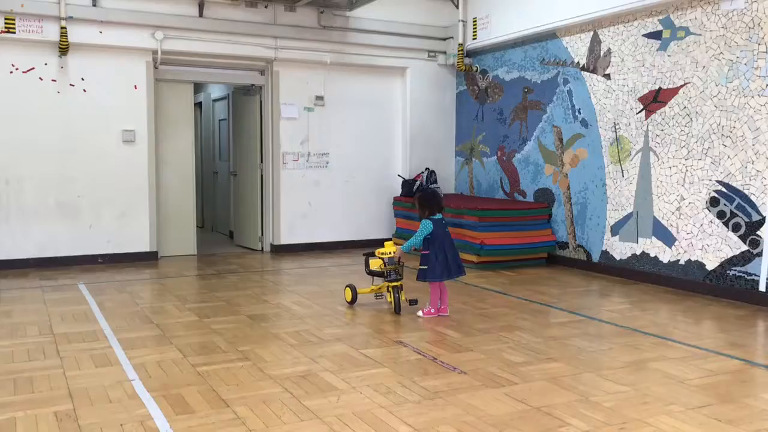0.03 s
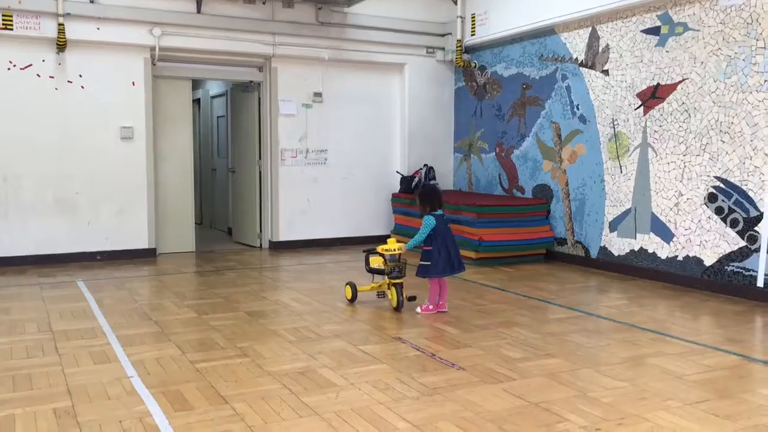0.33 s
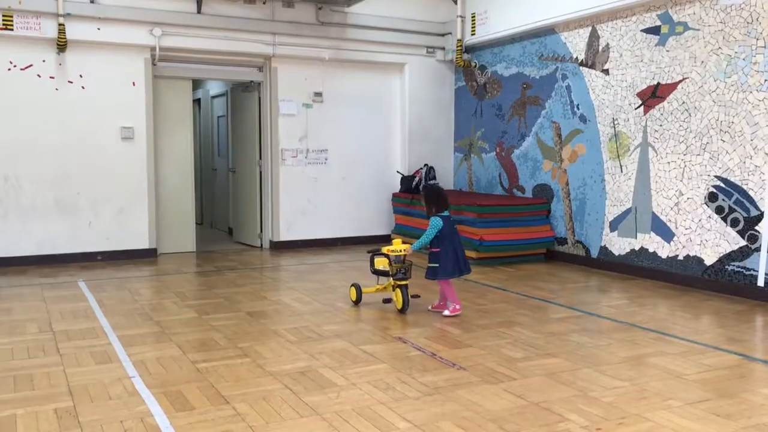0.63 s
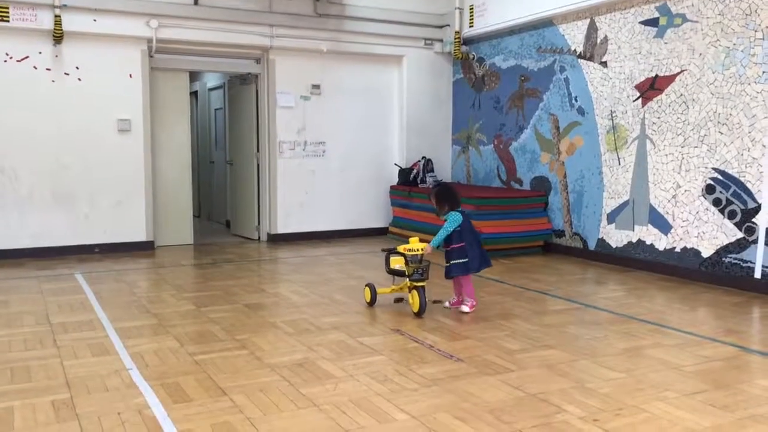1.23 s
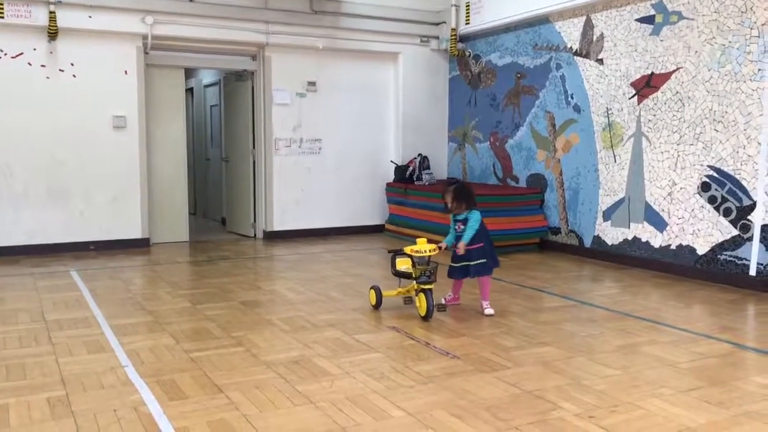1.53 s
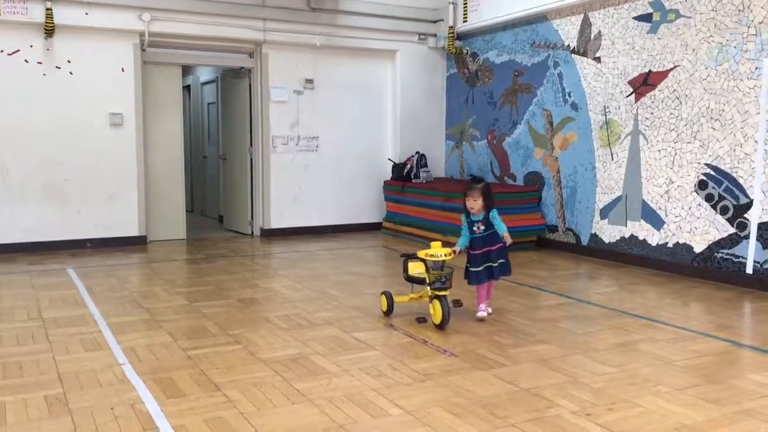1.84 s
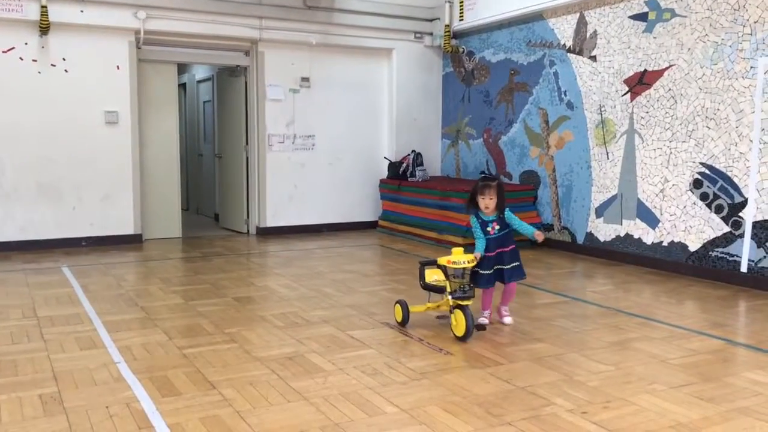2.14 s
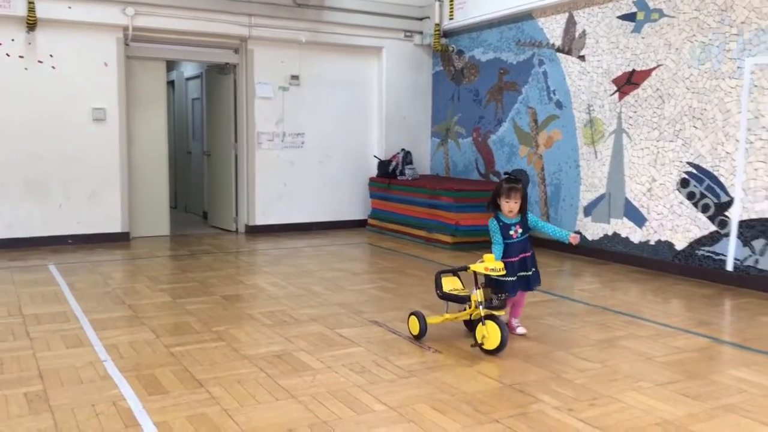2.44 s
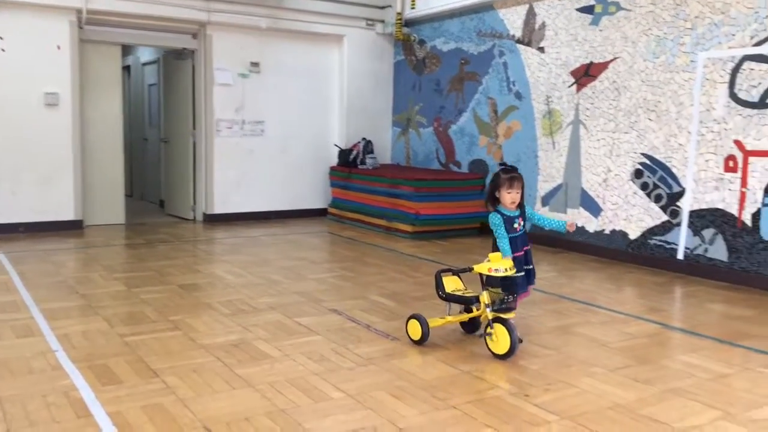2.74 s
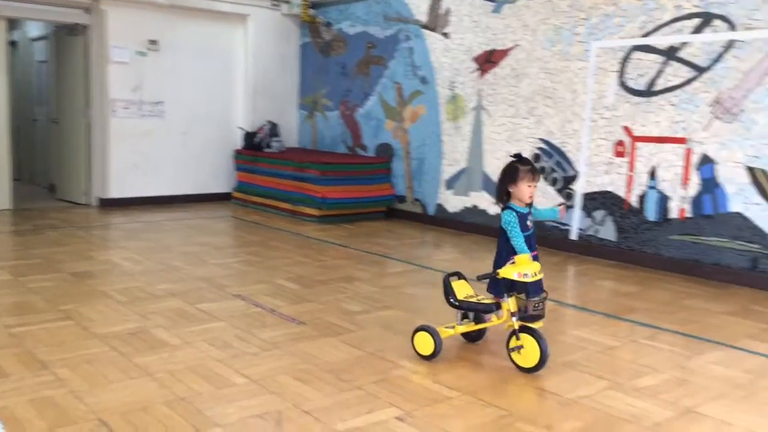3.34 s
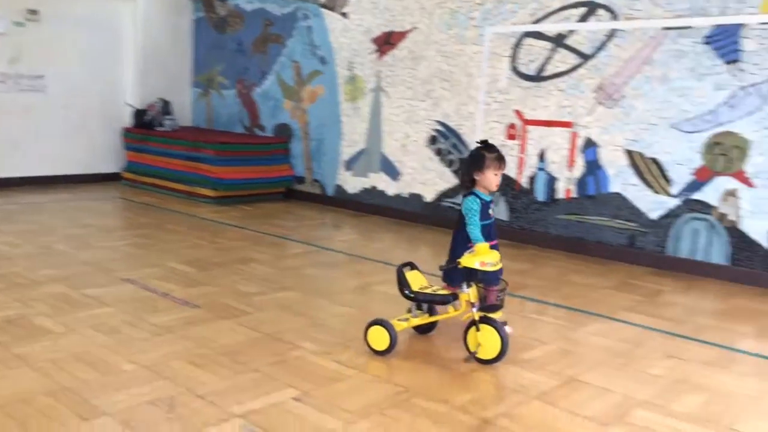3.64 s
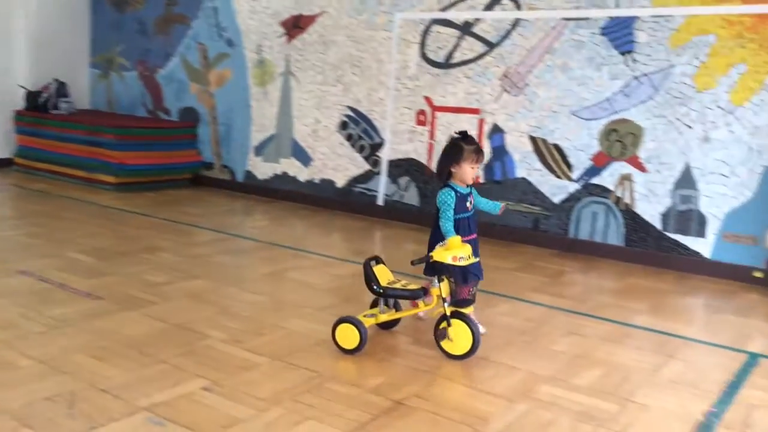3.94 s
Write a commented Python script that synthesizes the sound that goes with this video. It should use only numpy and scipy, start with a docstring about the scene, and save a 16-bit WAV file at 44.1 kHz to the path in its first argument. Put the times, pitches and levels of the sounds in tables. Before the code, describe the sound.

A small tricycle rolls over a wooden floor in an echoing hall with a steady low ventilation hum. Shoes scuff faintly at first, and the wheels start pattering and knocking at about 1 second. From 1.8 seconds it sounds closer and louder, its frame clattering and loose parts ticking. An axle squeals briefly four times between 1.9 and 3.2 seconds. The strongest rattles and thumps come around 3.3 to 3.8 seconds.

```python
"""Tricycle in an echoing hall

A small tricycle is pushed over the parquet towards the microphone. Its hard wheels patter and drum
on the boards, a wheel squeals on its axle, the frame clatters, loose parts tick and chirp, and shoes
scuff softly. The hall rings after each sound; behind it all lies the low hum of the ventilation."""
import sys
import numpy as np
from scipy import signal
from scipy.fft import rfft, irfft
from scipy.io import wavfile
from scipy.ndimage import uniform_filter1d

SR = 44100
rng = np.random.default_rng(int(sys.argv[2]) if len(sys.argv) > 2 else 0)


def put_to_file(sound):
    """Save the sound as 16-bit audio at rate SR, in the file named by the first command-line argument."""
    columns = np.atleast_2d(sound).T  # one column per channel
    safe = np.clip(columns, -1, 1)
    whole_steps = np.round(safe * 32767)
    wavfile.write(sys.argv[1], SR, whole_steps.astype(np.int16))


N = 176400

# rolling effort, rising as the tricycle nears the microphone: t/s, level/dB
ROLLING = [(0.1, -78), (0.85, -68), (1.08, -60.5), (1.19, -58.5), (1.45, -67), (1.53, -60.5), (1.66, -54.5),
           (1.77, -60), (1.82, -48.5), (2.05, -53), (2.25, -50), (2.42, -56.5), (2.6, -49.5), (3.05, -51),
           (3.25, -52), (3.4, -48), (3.52, -51), (3.65, -49), (4.0, -56.5)]
# low drumming of the wheels: t/s, level/dB
DRUMMING = [(0.1, -58.5), (1.53, -60), (1.64, -53.5), (3.3, -53), (3.34, -45), (4.0, -54)]
# tone colours of the wheels, floorboards and frame: f/Hz, level/dB
WHEEL_COLOUR = [(150, -27), (300, -13.5), (430, -5.5), (560, -3), (1250, -2.5), (1900, -6.5), (2700, -7),
                (3500, -11), (6000, -19.5), (9000, -31.5), (12000, -42)]
BOARD_COLOUR = [(100, -34.5), (170, 10.5), (220, 6), (300, 0.5), (420, -0.5), (700, -34.5)]
FRAME_COLOUR = [(150, -39.5), (400, -19.5), (900, -10.5), (1700, -8.5), (3000, -14), (6000, -26),
                (14000, -40)]
# resonances of wheels and frame: f/Hz, width/Hz, lift/dB
RESONANCES = [(300.5, 13.7, 14), (385.6, 10.5, 8), (552, 36, 6.5), (715, 98, 6.5), (927, 110, 6),
              (1210, 270, 4.5), (1430, 130, 4), (2540, 400, 3), (3000, 100, 0.5), (15500, 76, 13)]
# jolts that clatter the frame or thump the boards: t/s, level/dB, length/s, ringing f/Hz
FRAME_CLATTERS = [(0.915, -59, 0.091, 2550), (1.125, -53.5, 0.052, 1370), (1.53, -58, 0.091, 2640),
                  (1.792, -45.5, 0.059, 1600), (1.825, -52, 0.11, 3000), (2.149, -43.5, 0.11, 976),
                  (2.535, -49.5, 0.11, 2480), (3.325, -43, 0.12, 925), (3.577, -46, 0.086, 2130),
                  (3.588, -43, 0.045, 960)]
BOARD_THUMPS = [(0.915, -51, 0.065, 777), (1.13, -53, 0.092, 573), (1.525, -54.5, 0.12, 300),
                (2.16, -48.5, 0.14, 228), (3.335, -46, 0.092, 374), (3.525, -43.5, 0.03, 315),
                (3.585, -47.5, 0.13, 588), (3.715, -47.5, 0.071, 250)]
# squeals at the axle: t/s, length/s, level/dB, start f/Hz, end f/Hz
AXLE_SQUEALS = [(1.93, .17, -55, 1460, 1390), (2.17, .29, -55.5, 1290, 1250),
                (2.55, .42, -56.5, 1260, 1390), (3.085, .15, -47, 1320, 1260)]
# strikes of loose parts: t/s, level/dB, ringing f/Hz
PART_TICKS = [(1.215, -60.5, 10500), (1.226, -51, 4060), (1.486, -62, 11400), (1.583, -60, 9500),
              (1.618, -60, 6600), (1.632, -59, 4300), (1.793, -52.5, 4950), (1.811, -51.5, 6740),
              (1.927, -55, 12600), (1.96, -45.5, 7440), (2.034, -54.5, 7760), (2.049, -53.5, 6500),
              (2.15, -53.5, 4700), (2.264, -55, 7000), (2.303, -62, 9000), (2.614, -48, 6460),
              (2.629, -54, 8650), (2.827, -51.5, 7400), (2.928, -59, 6600), (2.976, -51, 4450),
              (3.117, -48.5, 9000), (3.187, -46.5, 8600), (3.283, -48, 6000), (3.332, -50, 5500),
              (3.376, -50, 6050), (3.417, -57, 5960), (3.578, -44.5, 3600), (3.692, -59, 12100),
              (3.709, -53, 5900), (3.808, -45.5, 14000), (3.807, -43, 4460)]
# rubs of soles and parts: t/s, length/s, level/dB, f/Hz, width/Hz
RUBS = [(0.2, .29, -72, 4700, 1600), (1.952, .025, -58, 7850, 600), (2.618, .115, -52.5, 4850, 480),
        (3.1, .02, -59, 9600, 1400), (3.182, .014, -60, 9600, 1400)]
# shoes sliding on the parquet: t/s, length/s, level/dB
SHOE_SCUFFS = [(0.46, 0.28, -69.5), (0.96, 0.28, -64.5), (2.396, 0.22, -59), (2.58, 0.11, -53.5)]
# hiss of a sliding sole: f/Hz, level/dB
SCUFF_COLOUR = [(2000, -3), (5000, 0), (9000, -3), (14500, -11)]
# tones of the ventilation fan: f/Hz, level/dB
FAN_TONES = [(45.1, -70), (77.9, -38.5), (110.9, -51.5), (180, -66.5), (2998, -79)]
# rush of air from the ventilation: f/Hz, level/dB
AIR_COLOUR = [(20, -44.5), (40, 8), (70, 5), (130, -3.5), (200, -7.5), (250, -18), (310, -16), (400, -24),
              (500, -18.5), (1000, -22.5), (2000, -27.5), (3100, -34.5), (3500, -38.5), (8000, -49.5),
              (15000, -49.5)]

BUMPS_PER_S, KNOCKS_PER_S, SLIPS_PER_S = 900, 420, 200
SQUEAL_WAVER, WAVER_S = .035, .004  # rms share of the pitch, smoothing time
TICK_DECAY_S, CRACK_WIDTH, RING_WIDTH = .0027, .75, .11  # widths as shares of the pitch
JIGGLE_HZ, JIGGLE_WIDTH_HZ = 5940, 3900
HALL_T60_S, TREBLE_T60_S, PREDELAY_S = 1.21, .58, .006  # treble: at 10 kHz


def amp(db):
    """Decibels to gain."""
    return 10 ** (np.asarray(db) / 20)


def unit(x):
    """Scale to rms 1."""
    return x / np.sqrt(np.mean(x ** 2) + 1e-20)


def curve(rows):
    """Gain over time from rows of t/s, level/dB."""
    return amp(np.interp(np.arange(N) / SR, *np.array(rows).T))


def colour(x, points):
    """Minimum-phase filter through rows of f/Hz, level/dB."""
    hz, db = np.array(points).T
    f = np.maximum(np.arange(N // 2 + 1) * SR / N, 1)
    gain = amp(np.interp(np.log(f), np.log(hz), db))
    cepstrum = irfft(np.log(gain), N)
    cepstrum[1:N // 2] *= 2
    cepstrum[N // 2 + 1:] = 0
    return irfft(rfft(x, N) * np.exp(rfft(cepstrum)), N)[:len(x)]


def ring(x, hz, width):
    """One resonance, gain 1 at its centre."""
    return signal.lfilter(*signal.iirpeak(min(hz, SR / 2 - 1), hz / width, fs=SR), x)


def steep_ring(x, hz, width):
    """The same resonance twice in series, for steeper flanks."""
    return ring(ring(x, hz, width), hz, width)


def impacts(per_s, spread_db):
    """Random tiny impacts of uneven size, rms 1."""
    hit = rng.random(N) < per_s / SR
    size = amp(spread_db * np.clip(rng.standard_normal(N), -2, 2))
    return unit(hit * size * rng.choice([-1, 1], N))


def add(out, start, x):
    """Mix a sound in at its time."""
    i = int(start * SR)
    out[i:i + len(x)] += x[:N - i]


def wheels():
    """Small bumps ring the hard wheels and drum on the boards."""
    patter = body(colour(impacts(BUMPS_PER_S, spread_db=2.5), WHEEL_COLOUR))
    drum = body(colour(impacts(BUMPS_PER_S, spread_db=2.5), BOARD_COLOUR))
    return curve(ROLLING) * amp(3) * patter + curve(DRUMMING) * drum


def body(x):
    """Wheels and frame lift the sound at their resonances; rms 1."""
    return unit(x + sum((amp(db) - 1) * ring(x, hz, width) for hz, width, db in RESONANCES))


def jolts(rows, points, ring_db):
    """Each jolt sets off a short run of knocks, coloured by what it shakes."""
    out, t = np.zeros(N), np.arange(SR // 2) / SR
    for start, db, length, hz in rows:
        knocks = impacts(KNOCKS_PER_S, spread_db=2)[:len(t)]
        rattle = body(colour(knocks, points))
        ringing = amp(ring_db) * unit(steep_ring(knocks, hz, width=hz / 4))
        add(out, start, amp(db) * unit(rattle + ringing) * np.exp(-(t / length) ** 2))
    return out


def squeals():
    """A wheel sings on its axle: one unsteady tone that slides a little in pitch."""
    out = np.zeros(N)
    for start, length, db, from_hz, to_hz in AXLE_SQUEALS:
        n = int(length * SR)
        waver = unit(uniform_filter1d(rng.standard_normal(N), int(WAVER_S * SR)))[:n]
        hz = np.linspace(from_hz, to_hz, n) * (1 + SQUEAL_WAVER * waver)
        tone = unit(np.sin(2 * np.pi * np.cumsum(hz) / SR))
        add(out, start, amp(db) * tone * signal.windows.tukey(n, .15))
    return out


def ticks():
    """A loose part strikes: a brief broad crack and a narrow ring around its own pitch."""
    out, t = np.zeros(N), np.arange(SR // 20) / SR
    for start, db, hz in PART_TICKS:
        contact = amp(db) * rng.choice([-1, 1], len(t)) * np.exp(-t / TICK_DECAY_S)
        crack, tone = (ring(contact, hz, width) * np.sqrt(SR / np.pi / width)  # equal power
                       for width in (hz * CRACK_WIDTH, hz * RING_WIDTH))
        add(out, start, crack + amp(-1) * tone)
    return out


def chirps():
    """Stick-slip pulses excite one narrow resonance and weaken as the rub goes on."""
    out = np.zeros(N)
    pulses = np.exp(-2 * (np.arange(N) * SLIPS_PER_S / SR % 1))
    for start, length, db, hz, width in RUBS:
        n = int(length * SR)
        slips = pulses * rng.standard_normal(N)
        tone = unit(steep_ring(slips, hz, width)[-n:])
        fade = amp(np.linspace(2, -2, n))
        add(out, start, amp(db) * tone * fade * signal.windows.tukey(n, .2))
    return out


def jiggle():
    """Loose fittings click faintly at random, harder as the tricycle rolls faster."""
    clicks = steep_ring(impacts(per_s=45, spread_db=8), JIGGLE_HZ, JIGGLE_WIDTH_HZ)
    return curve(ROLLING) * amp(-19) * unit(clicks)


def scuffs():
    """Shoes slide lightly on the parquet: a fine hiss that swells and fades."""
    hiss = unit(colour(impacts(per_s=4000, spread_db=1.9), SCUFF_COLOUR))
    swells = np.zeros(N)
    for start, length, db in SHOE_SCUFFS:
        add(swells, start, amp(db) * signal.windows.cosine(int(length * SR)))
    return swells * hiss


def hall(x, wet_db):
    """Sound reaches the microphone directly, then as a diffuse tail whose treble dies sooner."""
    t = np.arange(SR * 2) / SR
    f = np.arange(SR + 1) / 2
    spectrum, tail = rfft(rng.standard_normal(len(t))), 0
    centres = np.geomspace(200, 14000, 7)
    for hz, pick in zip(centres, np.eye(len(centres))):
        t60 = HALL_T60_S / (1 + (HALL_T60_S / TREBLE_T60_S - 1) * (hz / 10000) ** 1.5)
        band = irfft(spectrum * np.interp(f, centres, pick))
        tail = tail + band * np.exp(-np.log(1000) * t / t60)
    tail *= t > PREDELAY_S
    tail *= np.sqrt(2 * np.log(1000) / (HALL_T60_S * SR))  # about unit gain in the bass
    echo = amp(wet_db) * signal.fftconvolve(x, tail)[:N]
    return (x + echo) / np.hypot(1, amp(wet_db))


def ventilation():
    """Room tone: steady fan tones over a dull rush of air."""
    t = np.arange(N) / SR
    hum = sum(np.sqrt(2) * amp(db) * np.sin(2 * np.pi * (hz * t + rng.random())) for hz, db in FAN_TONES)
    air = unit(colour(rng.standard_normal(N), AIR_COLOUR))
    return hum + amp(-46.5) * air


def scene():
    """Tricycle and shoes in the hall, over the ventilation, at one mono microphone."""
    clatter = jolts(FRAME_CLATTERS, FRAME_COLOUR, ring_db=-2.5)
    thumps = jolts(BOARD_THUMPS, BOARD_COLOUR, ring_db=7.5)
    bright = amp(3.5) * ticks() + jiggle() + chirps() + amp(-.5) * squeals()
    room_tone = ventilation()
    rolling = wheels() + clatter + thumps + scuffs()
    return (hall(rolling, wet_db=-1) + hall(bright, wet_db=4.5) + room_tone)[None]


def record(dry):
    """The sound sets in after a moment and the highest treble is cut."""
    start_s, top_hz = .035, 15400
    live = dry * (np.arange(N) / SR > start_s)
    return signal.sosfilt(signal.ellip(10, .2, 80, top_hz, fs=SR, output="sos"), live)


dry = scene()
out = record(dry)
put_to_file(out)
```